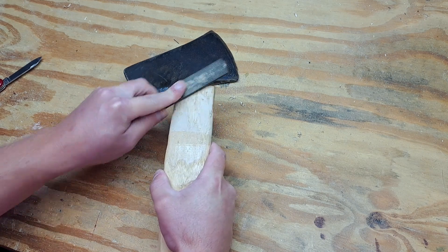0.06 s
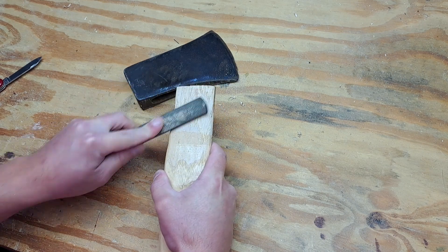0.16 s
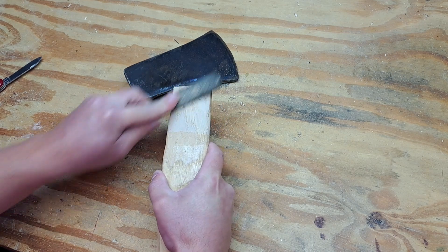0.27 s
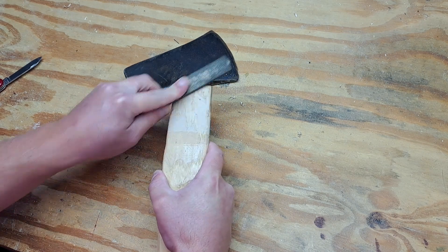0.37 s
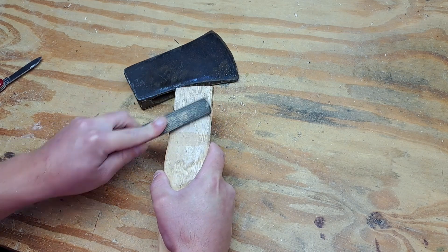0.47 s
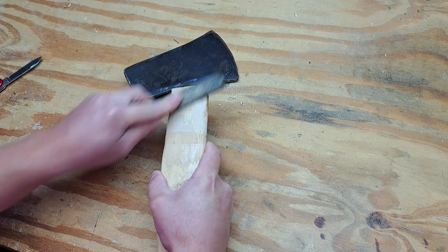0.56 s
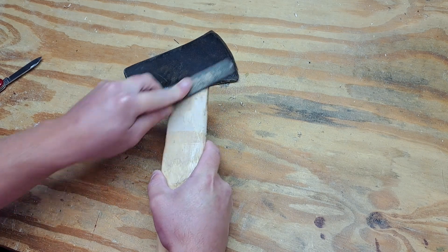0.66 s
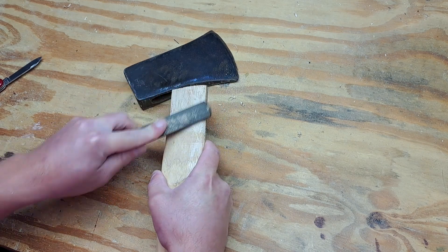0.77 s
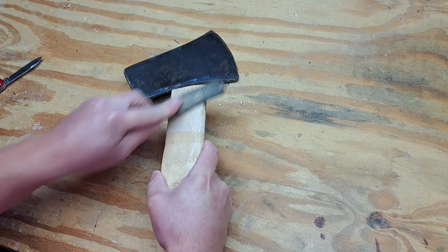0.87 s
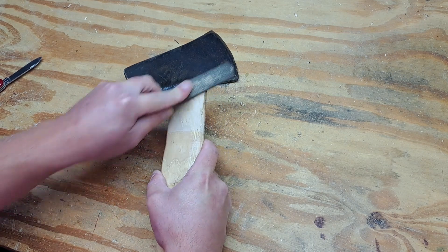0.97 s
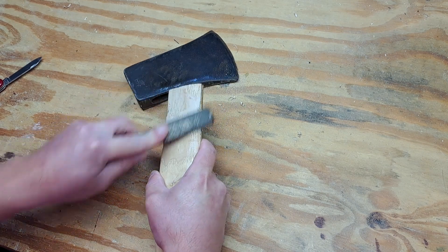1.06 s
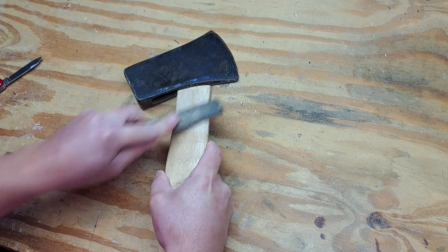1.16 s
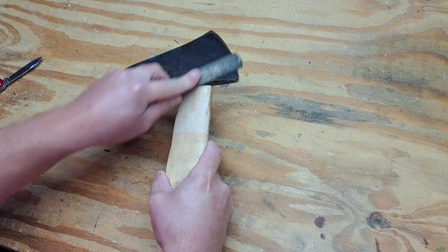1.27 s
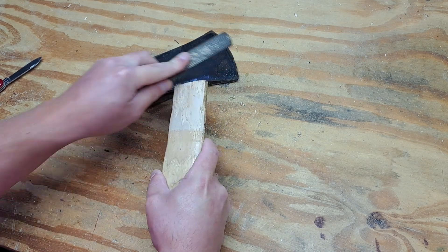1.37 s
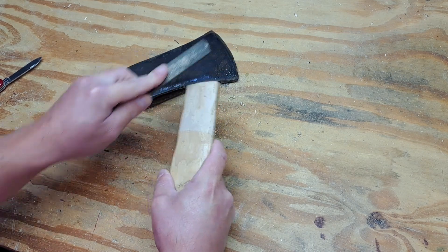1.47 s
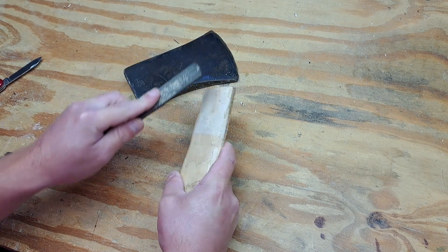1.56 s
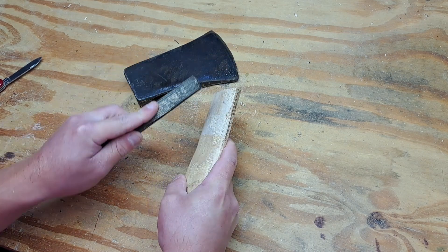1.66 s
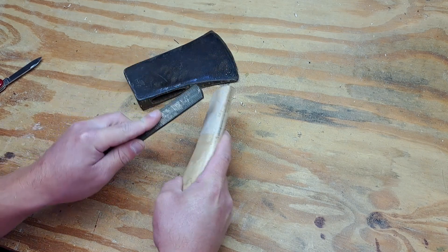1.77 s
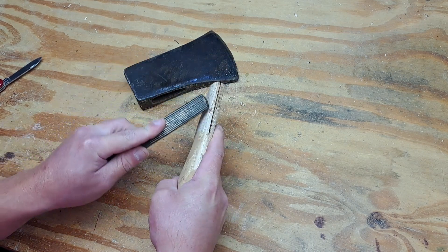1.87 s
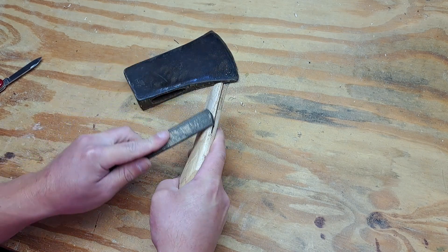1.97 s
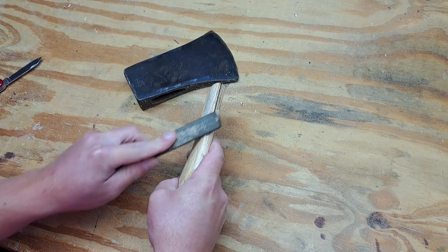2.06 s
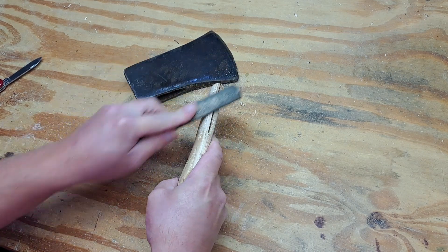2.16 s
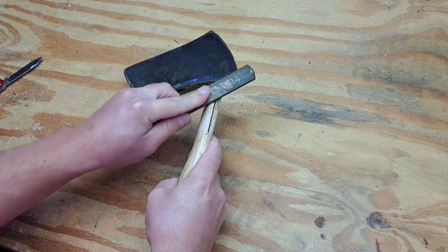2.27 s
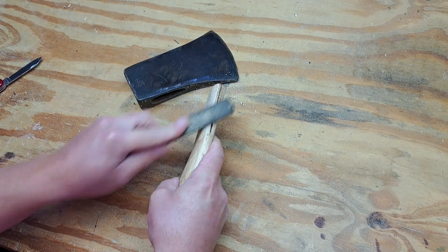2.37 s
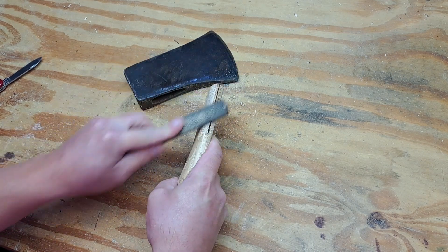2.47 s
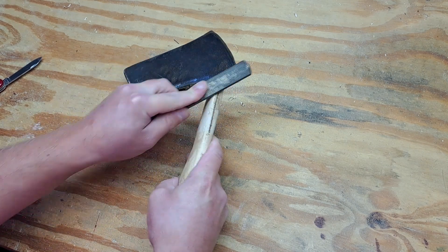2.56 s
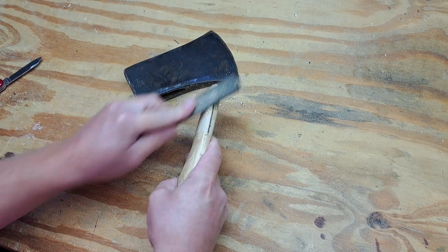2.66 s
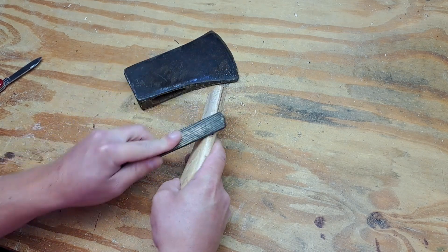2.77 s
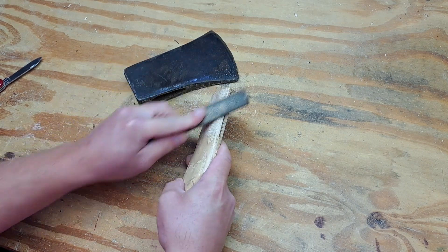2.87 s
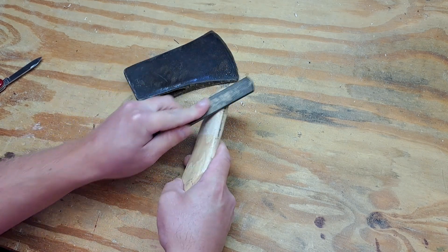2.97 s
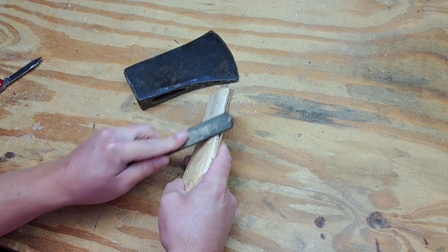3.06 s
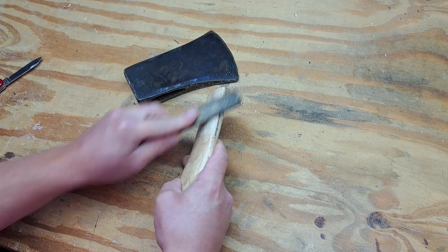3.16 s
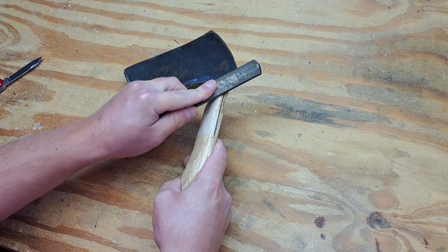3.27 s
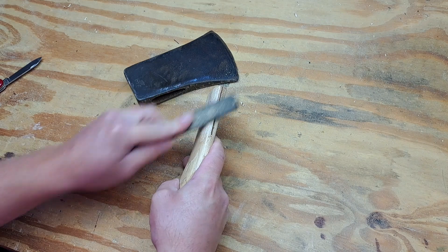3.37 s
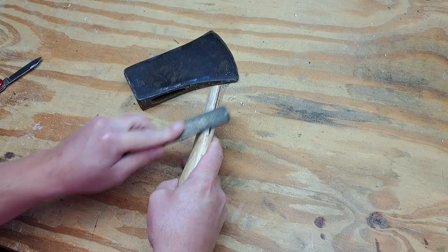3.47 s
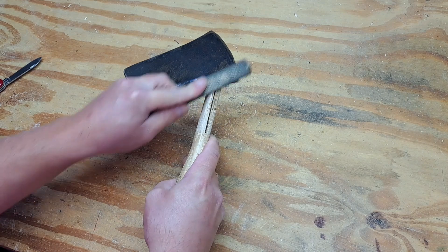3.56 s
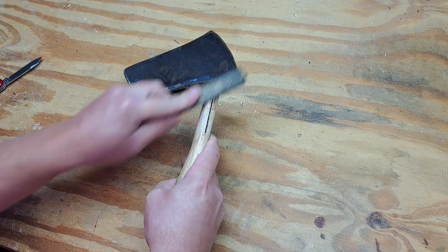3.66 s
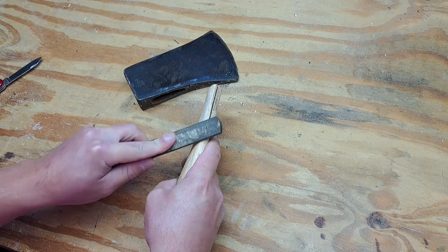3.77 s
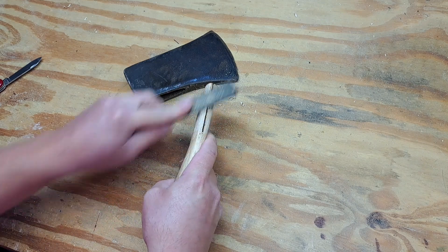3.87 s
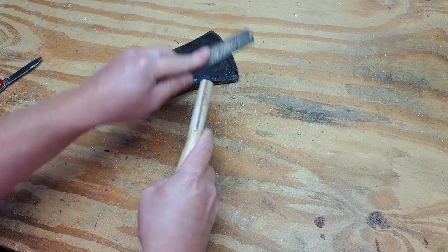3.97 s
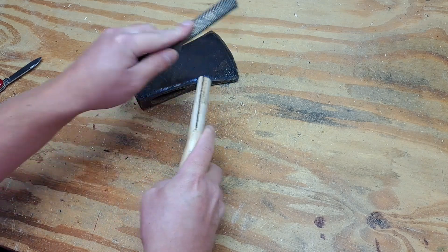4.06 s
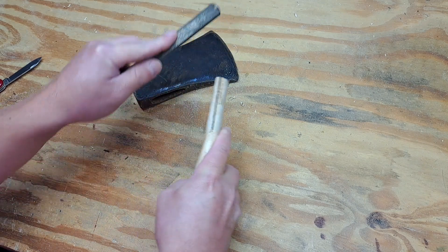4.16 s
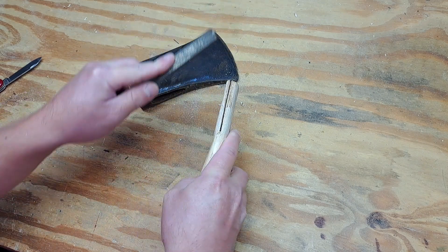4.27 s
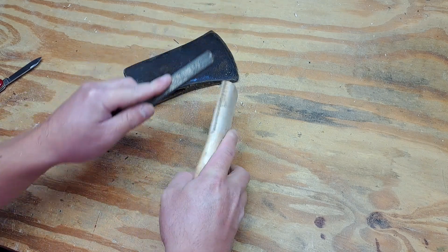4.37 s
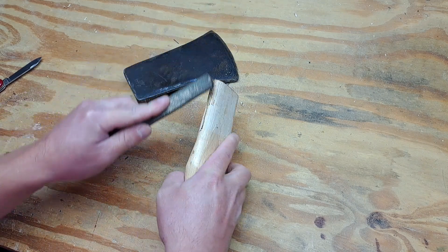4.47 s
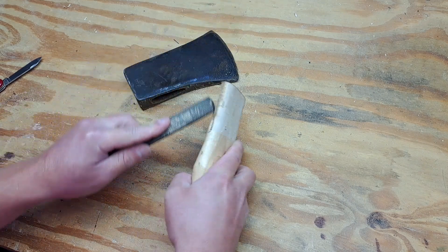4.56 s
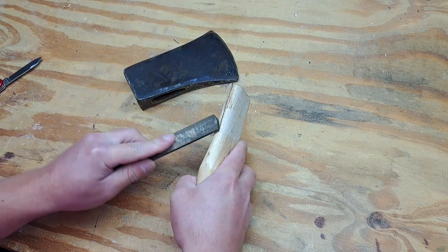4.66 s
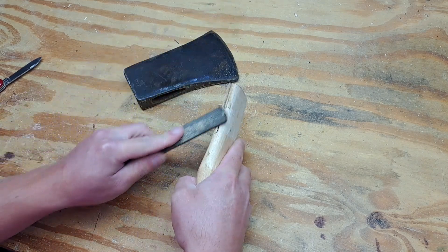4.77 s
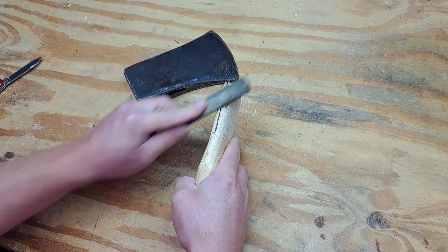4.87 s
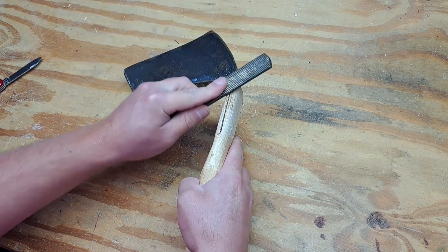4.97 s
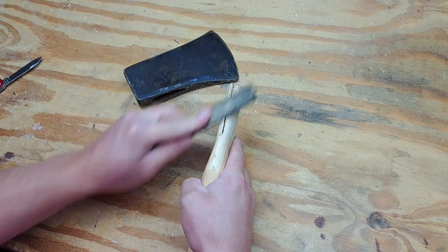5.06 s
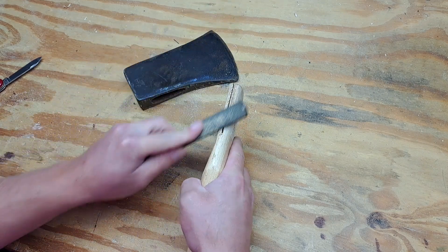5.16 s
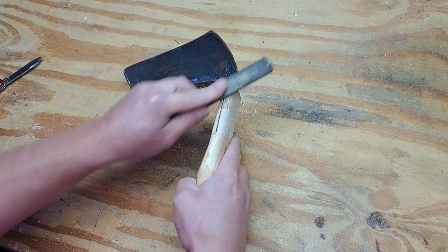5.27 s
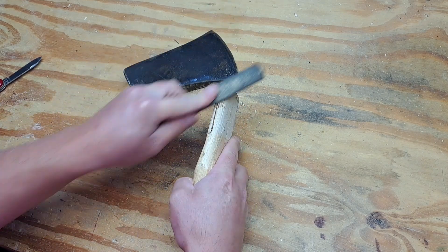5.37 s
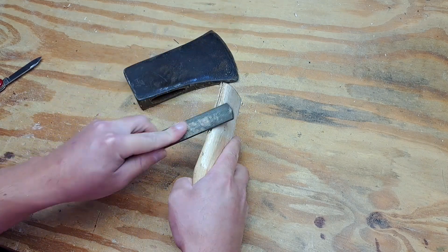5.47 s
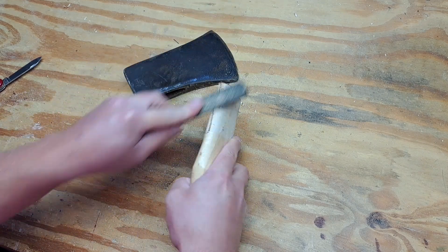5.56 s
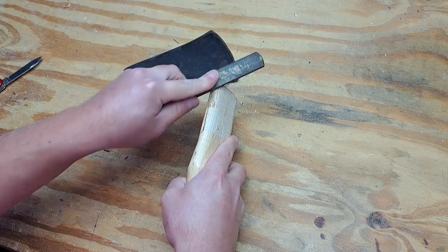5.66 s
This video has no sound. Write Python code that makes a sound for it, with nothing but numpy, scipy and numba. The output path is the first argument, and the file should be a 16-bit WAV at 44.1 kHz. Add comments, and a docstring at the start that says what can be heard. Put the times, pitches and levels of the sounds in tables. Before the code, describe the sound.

A metal rasp scrapes quickly back and forth on a wooden tool handle, gritty and hollow, with two short pauses over a low workshop hum.

```python
"""A rasp is pushed and pulled over a wooden tool handle that rests on a plywood bench: first on its flat face,
then on its edge, then on the bevel between. Random tooth ticks ring modes of bench, handle and steel.
Knocks add single blows; chips and dust add a fine hiss. A left-right microphone pair hears the rasp over
a short, scattered workshop echo. Behind it a fridge-like motor hums in wavering tones, shaped noise makes
the air hiss, and pulsed narrow noise makes a faint cricket."""
import sys
import numpy as np
from scipy import signal
from scipy.fft import rfft, irfft
from scipy.io import wavfile
from scipy.ndimage import uniform_filter1d
from numba import njit

SR = 44100
rng = np.random.default_rng(int(sys.argv[2]) if len(sys.argv) > 2 else 0)


def store_wav(level_fs):
    """Save 16-bit WAV to argv[1]."""
    pcm = np.round(np.clip(np.atleast_2d(level_fs), -1, 1) * 32767)
    wavfile.write(sys.argv[1], SR, pcm.T.astype(np.int16))


N = 252252
T = np.arange(N) / SR

# Motor and mains tones, rms levels: pitch_hz, start_db, end_db, waver_db
HUM = [(59.2, -44, -48, 1.2), (107.7, -56, -45, 1.2), (119.6, -57, -56, 1.2), (215.3, -66, -65, 2),
       (323.0, -69, -71, 2), (527.6, -73, -72, 2), (705.2, -75, -74, 2), (1728, -79, -78, 2)]
# Spectrum of the room air: pitch_hz, relative_level_db (per Hz)
AIR = [(18, -36), (30, -1), (66, -8), (117, -5.5), (168, -22.5), (225, -17), (341, -19.5), (410, -28),
       (532, -23), (1260, -28.5), (1680, -25.5), (2620, -32), (4310, -31), (6000, -37.5), (7400, -51),
       (15500, -51)]
# Tilt of the air noise between the microphones: pitch_hz, left_minus_right_db
AIR_BALANCE = [(60, -1.5), (110, 0), (200, -3), (380, 2.5), (700, -1), (1290, 0), (2380, 0.5), (4400, -0.5),
               (8120, 8), (15000, 11)]
# Cricket chirps: start_s, relative_level_db
CHIRPS = [(1.39, -66), (1.69, -67), (2.0, -63.5), (4.21, -64.5), (4.519, -67)]
# Chips and dust whisper down as the hands shift:
# loudest_s, level_db (before the left-right tilt), rise_s, hold_s, fall_s (rise and fall span 60 dB)
DUST = [(1.33, -63, .05, 0.14, .9), (4.43, -64.5, .12, .04, .3), (4.53, -69, .2, .03, 0.3)]
# The handle bumps the bench or the rasp lands: start_s, relative_push_db, hardness_db (tap against push)
KNOCKS = [(1.034, -23.5, -20), (2.003, -42, -15), (2.554, -23.5, -14), (2.777, -24, -22), (3.092, -27, -21),
          (3.706, -21.5, -17), (4.683, -36.5, -9.5), (5.069, -22.5, -18), (5.105, -19.5, -16),
          (5.394, -29.5, -9), (5.616, -20.5, -22)]
# Rasp strokes: full_speed_s, rise_s, hold_s, fall_s, swell_db (over the hold),
# then drive levels steel_db, bench_db, low_wood_db, high_wood_db
STROKES = [(-0.025, 0.092, 0.052, 0.054, -3.5, -28, -35, -26.5, -24.5),
           (0.158, 0.064, 0.015, 0.063, 3, -31.5, -38, -28.5, -27.5),
           (0.29, 0.051, 0.011, 0.072, 3, -27.0, -33.5, -28.0, -24),
           (0.461, 0.06, 0.012, 0.059, 0.5, -31.0, -37, -31.5, -25.5),
           (0.583, 0.062, 0.052, 0.038, 5, -35, -39, -30.5, -27.5),
           (0.731, 0.077, 0.049, 0.057, 5.5, -37, -32.5, -34, -30),
           (0.873, 0.058, 0.067, 0.044, 12, -35.5, -40.5, -33, -29.5),
           (1.053, 0.073, 0.047, 0.074, -1, -38.5, -31.5, -32, -32),
           (1.209, 0.057, 0.068, 0.077, 7, -35.5, -32.5, -30.5, -30.5),
           (1.373, 0.051, 0.025, 0.074, -7, -59, -52.5, -48, -50),
           (2.013, 0.017, 0.14, 0.062, 15, -60, -45, -46, -48),
           (2.161, 0.053, 0.056, 0.1, -3, -31.5, -32.0, -34, -34.5),
           (2.394, 0.071, 0.02, 0.066, 1.5, -39.5, -31, -29.5, -36.0),
           (2.516, 0.036, 0.029, 0.096, 1, -30.5, -30.5, -30, -31.5),
           (2.733, 0.11, 0.03, 0.051, -1.5, -39.5, -30.0, -34, -38),
           (2.862, 0.047, 0.029, 0.096, 3, -29, -28.5, -31.5, -32.5),
           (3.051, 0.051, 0.038, 0.063, 10, -41, -32.5, -35, -39),
           (3.17, 0.029, 0.069, 0.08, 6, -32, -32.5, -34.5, -32.5),
           (3.383, 0.079, 0.042, 0.051, 6.5, -39.5, -27, -31.5, -36),
           (3.547, 0.073, 0.019, 0.082, -0.5, -31, -32.0, -28.5, -31),
           (3.707, 0.057, 0.058, 0.072, 1, -41.5, -31, -33, -38.5),
           (3.9, 0.082, 0.029, 0.066, 0, -32, -31.5, -31.0, -30.5),
           (4.012, 0.059, 0.025, 0.14, -5, -60, -60, -55.5, -53.5),
           (4.69, 0.012, 0.042, 0.11, -3.0, -72, -41.5, -54.5, -62),
           (4.847, 0.078, 0.082, 0.087, 1.5, -35.0, -28, -33, -35),
           (5.078, 0.052, 0.041, 0.082, 2.5, -42.5, -26.5, -27.0, -38),
           (5.239, 0.06, 0.054, 0.064, -1.5, -32.5, -30, -31, -34.5),
           (5.414, 0.054, 0.065, 0.044, -2, -39, -32, -29.5, -37.0),
           (5.62, 0.095, 0.024, 0.063, 2.5, -32.5, -30, -23.5, -32.5)]
# When the rasp moves on to the next spot: start_s
TURNS_S = [.55, 1.9, 4.35, 5.02]
# The teeth bite in suddenly: start_s, jump_db (as much lower just before; negative reverses it)
BITES = [(0.274, 3.5), (0.72, 9), (1.024, 0), (1.19, 5.5), (2.004, -2), (2.835, 2), (2.852, 2.5),
         (3.376, -3.5), (3.512, -3), (3.703, 3.5), (3.848, 3), (4.686, 11.5), (5.082, 2), (5.398, -1)]
# Brief surges: the teeth dig in and brighten, or the handle shudders on the bench:
# centre_s, half_length_s, steel_extra_db, bench_extra_db, wood_extra_db
SURGES = [(0.028, 0.017, 0, 0.5, 0), (0.198, 0.015, -1.5, 4, 3.5), (0.639, 0.012, 6.5, 3, -0.5),
          (0.949, 0.012, 4.5, 5, 0.5), (1.046, 0.013, 0, 3, 1), (1.292, 0.017, 5, 3, 1.5),
          (2.19, .015, 1, 4.5, 2), (2.452, 0.022, -3, 6.5, 1.5), (2.57, 0.018, 2, 2.5, 0),
          (2.783, 0.014, -3, 6.5, 0), (2.92, .015, 0, 2.5, -0.5), (3.133, 0.018, -5, 6, 1),
          (3.253, .015, 3.5, 0.5, -0.5), (3.453, .012, 1, 0, 3.5), (3.564, .015, 2, 4, 0),
          (3.788, 0.016, -0.5, 2.5, 1), (3.92, 0.016, 3, -2, -1), (4.929, .015, -0.5, -4, 4.5),
          (5.098, 0.013, -1.5, -2, 2), (5.148, 0.014, 0.5, 5.5, 0.5), (5.312, 0.013, 1, 1, 2),
          (5.498, .02, 0, 5.5, 0.5), (5.635, 0.015, 0.5, 2, 2.5)]
# The next three each list steel, bench, low wood, high wood.
# Loss once the rise or fall time is spent: loss_db
STOPPED_DB = [24.2, 12, 19.4, 21.3]
# How much of a stroke's swell reaches each body: share (0 to 1)
SWELL_SHARE = [0.66, 0.49, 0.62, 0.52]
# How late each body follows the stroke: delay_s
LATE_S = [0.0021, 0.0062, 0.001, 0.00033]
# Modes of the plywood bench: pitch_hz, width_hz (nominal), then relative levels face_near_tip_db,
# face_lower_down_db, edge_db, bevel_top_db, bevel_foot_db, then left_minus_right_db, left_lead_rad
BENCH = [(54, 26, -49, -46, -41.5, -48, -47, -0.5, 0.052), (86, 44, -46, -39.5, -39.5, -41.5, -36.5, 0, 0),
         (146, 52, -47, -41, -39, -39, -38, -1, -0.057),
         (189, 28.4, -53, -44.5, -37, -45, -35.5, -4.5, 0.12),
         (214.8, 28, -46.5, -41.5, -36, -31.5, -32, 0.5, -0.0056),
         (241.5, 44, -51.5, -48.5, -39, -38.5, -37.5, -3.5, 0.23),
         (294.7, 57, -45, -46, -41, -53, -37, 0.5, 0.054),
         (353, 49, -43.5, -47, -51, -52, -41, -2.5, -0.18)]
# Modes of the wooden handle: columns as for the bench [Hz, Hz, five dB, dB, rad]
HANDLE = [(425.7, 49.6, -36.5, -37, -39, -35.5, -35, -3, 0.48),
          (476, 23.4, -45, -37.5, -43, -45, -37.5, -1.5, -0.8),
          (518, 41, -43.5, -55, -46.5, -46, -49, 6.5, 1.6), (617, 115, -44, -45, -44, -44, -41.5, -7.5, 1),
          (736.5, 49, -45.5, -44, -39.5, -38, -37, 0.5, 0.66),
          (777, 41, -50.5, -46.5, -48.5, -45, -45, 0, 0.3), (863, 98, -56, -51, -47, -44.5, -44.5, -2, 1),
          (1028, 49, -51, -44, -43.5, -51, -47, 6, 0.76), (1117, 75, -42, -36, -47, -53.5, -49.5, -6.5, 0),
          (1228.4, 45, -36.5, -39.5, -52, -48, -44.5, 2.5, 0.93),
          (1327, 59, -45.5, -40.5, -43.5, -45.5, -39, -5, 1.57),
          (1520, 240, -39, -44.5, -48, -40.5, -47.5, 3, 1.18),
          (1682, 100, -44, -53.5, -53.5, -40, -49, -4, 2.5),
          (1839.6, 44, -39.5, -44.5, -44, -49, -54, -1.5, 1.56),
          (1945, 74, -38.5, -50, -50.5, -47, -49, 2.5, 2.16),
          (2096, 130, -42.5, -46.5, -50.5, -54, -50.5, -1, 0.7),
          (2336, 98, -41.5, -44, -46.5, -53, -50, 2, 1.5),
          (2500, 170, -55, -53.5, -48.5, -52.5, -58, 4.5, 2.07),
          (2790, 320, -44, -47.5, -51, -50, -50.5, -5.5, 2.03),
          (3152, 180, -39.5, -46, -55, -53, -52, 5, 1.1)]
# Modes of the steel rasp: columns as for the bench [Hz, Hz, five dB, dB, rad]
STEEL = [(3510, 420, -40, -49.5, -48, -51, -51.5, 0, 1.97),
         (3850, 160, -43, -41, -43.5, -42.5, -43.5, -1, 3),
         (4290, 310, -45.5, -47.5, -45.5, -47, -48, 2, -1.5),
         (4720, 120, -41.5, -47.5, -48, -49, -47, -6, -2),
         (5010, 170, -42.5, -48, -47, -48, -49, -0.5, -1.5),
         (5350, 310, -36, -61, -57.5, -55, -46, -4.5, -2.5),
         (5550, 190, -48, -43.5, -44.5, -40.5, -43.5, -3.5, -3.5),
         (5890, 195, -46.5, -42, -44.5, -43.5, -49.5, 10, 2),
         (6240, 260, -49.5, -45, -42, -45.5, -46, -3, 2), (7070, 540, -47.5, -51, -50.5, -50, -53.5, 3, -2),
         (8250, 4100, -48, -52.5, -53.5, -54, -57, 8, -0.5),
         (9470, 1550, -55.5, -59, -50, -51, -55.5, 9, 3.5), (10300, 1700, -57, -76, -68, -61, -56.5, 0, -1),
         (12160, 1300, -53, -55, -51, -50.5, -54, 11, 0.5),
         (14460, 1900, -49, -50, -46.5, -47, -48.5, 3, -3)]

AIR_DB = -49.5  # rms
ROOM_T60_S, ROOM_DB = 0.14, -17.5  # decay and level of the duller echo, against the direct sound
TICKS_PER_S, TICK_SPREAD_DB, CHATTER_DB = 5000, 2, 1
SPLIT_HZ = 900  # handle modes below are low wood, the rest high wood
EASING = 1.4  # how round the start and end of a stroke are
TOP_HZ = 15780  # top of the recorder's range


def undb(db):
    """Decibels to gain."""
    return 10 ** (np.asarray(db) / 20)


def unit(x):
    """Scaled to rms 1."""
    return x / np.sqrt(np.mean(x ** 2))


def band(x, lo_hz, hi_hz):
    """Gentle band-pass."""
    edges = [lo_hz, min(hi_hz, .45 * SR)]
    return signal.sosfilt(signal.butter(2, edges, "bandpass", fs=SR, output="sos"), x)


def walk(rate):
    """Random levels held 1 / rate s and slewed twice; spread 1."""
    k = int(SR / rate)
    steps = np.repeat(rng.standard_normal(N // k + 1), k)
    return unit(uniform_filter1d(uniform_filter1d(steps, k), k)[:N])


def on_log(table, hz):
    """A (pitch_hz, value) table read on a log-frequency axis."""
    f, v = np.transpose(table)
    return np.interp(np.log(np.maximum(hz, 1)), np.log(f), v)


def air():
    """Steady room noise: bass shared by both microphones, treble unrelated."""
    hz = np.fft.rfftfreq(N, 1 / SR)
    mid, side = rfft(rng.standard_normal((2, N))) * undb(on_log(AIR, hz))
    alike = 1 / (1 + (hz / 350) ** 2)
    pan = undb(on_log(AIR_BALANCE, hz) / 2)
    shared, opposed = np.sqrt(1 + alike) * mid, np.sqrt(1 - alike) * side
    pair = np.array([(shared + opposed) * pan, (shared - opposed) / pan])
    return unit(irfft(pair, N)) * undb(AIR_DB + 0.6 * walk(3.84))


def hum():
    """Motor and mains tones that waver a little, nearly the same left and right."""
    tones = np.zeros(N)
    for hz, start_db, end_db, waver_db in HUM:
        level_db = start_db + (end_db - start_db) * T / T[-1] + waver_db * walk(5.9)
        tones += undb(level_db) * np.sin(2 * np.pi * (hz * T + rng.random()))
    return np.sqrt(2) * tones * undb([[-.6], [.6]])


def cricket(hz=4290, pulse_hz=45, length_s=0.055):
    """Short throbbing chirps of a wing resonance, made of narrow noise."""
    gate = np.zeros(N)
    for s, db in CHIRPS:
        sounding = (T > s) & (T < s + length_s)
        gate += undb(db) * sounding * np.sin(np.pi * pulse_hz * (T - s)) ** 2
    tone = unit(band(rng.standard_normal((2, N)), hz - 70, hz + 70))
    return band(2.8 * gate * tone, hz - 200, hz + 200)


def dust():
    """Chips and dust: a fine, high hiss, stronger at the left microphone."""
    gain = 0
    for s, db, rise, hold, fall in DUST:
        slack = np.maximum(np.maximum((s - T) / rise, (T - s - hold) / fall), 0)
        gain = gain + undb(db - 60 * slack)
    hiss = band(band(rng.standard_normal((2, N)), 8500, 20000), 8500, 20000)
    return gain * unit(hiss) * undb([[5], [-2]])


def room(x):
    """Decaying scatter off walls and shelves, duller as it fades, different at each microphone."""
    t = T[:SR // 2]
    tail = rng.standard_normal((2, len(t))) * (t > .006)  # the first echo comes after 6 ms
    dull = band(tail, 66, 2320) * undb(-60 * t / ROOM_T60_S)
    bright = band(tail, 2950, 20000) * undb(-60 * t / (0.85 * ROOM_T60_S))
    dull_size = np.sqrt((dull ** 2).sum(axis=1).mean())
    echo = (dull + bright) / dull_size * undb(ROOM_DB)
    return signal.fftconvolve(x, echo, axes=1)[:, :N]


def ticks():
    """Teeth catching fibres at random moments, a few much harder than the rest."""
    strength, chance = rng.random((2, N))
    hardness = undb(-TICK_SPREAD_DB * np.log(strength + 1e-9))
    return unit(hardness * (chance < TICKS_PER_S / SR))


def blows(soft_s):
    """A soft push for the bench and a sharp tap for the handle at every knock."""
    low, high = np.zeros(N), np.zeros(N)
    for s, db, hard_db in KNOCKS:
        low[int(s * SR)] = undb(db)
        high[int(s * SR)] = undb(db + hard_db)
    return np.convolve(low, np.hanning(int(soft_s * SR)))[:N], high


def effort():
    """Drive of each body in dB: every stroke speeds up, holds while it swells or fades, and slows down."""
    depth_db, share, late = (np.array(v)[:, None] for v in (STOPPED_DB, SWELL_SHARE, LATE_S))
    coarse = T[::64]
    t = coarse - late
    power = 1e-18
    for s, rise, hold, fall, swell_db, *peak_db in STROKES:
        slack = np.maximum(np.maximum((s - t) / rise, (t - s - hold) / fall), 0)
        lean = np.clip((t - s) / hold, 0, 1) - .5
        level_db = np.array(peak_db)[:, None] + share * swell_db * lean - depth_db * slack ** EASING
        power = power + undb(level_db) ** 2
    surge_db = 0
    for s, half, steel, bench, wood in SURGES:
        extra_db = np.array([steel, bench, wood, wood])[:, None]
        surge_db = surge_db + extra_db * np.exp(-((coarse - s) / half) ** 2)
    return [np.interp(T, coarse, db) for db in 10 * np.log10(power) + surge_db]


@njit
def resonate(x, pole):
    """Two equal complex poles in a row, free to move every sample; the valleys between modes stay dark."""
    y = np.empty(x.shape, np.complex128)
    for c in range(x.shape[0]):
        a = b = 0j
        for i in range(x.shape[1]):
            a = a * pole[i] + x[c, i] + 1e-18
            b = b * pole[i] + a
            y[c, i] = b
    return y


def ring(modes, push, blow, spot, lo_hz, hi_hz, wander_db=2.5, bend=0.0095, alike_hz=2500, least=.4):
    """Ticks and blows ring a body's modes, shares set by spot; the right microphone hears part its own way."""
    modes = np.array(modes, float)
    power = 10 ** (modes[:, 2:-2] / 10)
    share = np.sqrt(2 * power / power.sum(axis=0))  # the same total power at every spot
    out = np.zeros((2, N))
    for k, (hz, width, pan_db, lead) in enumerate(modes[:, [0, 1, -2, -1]]):
        r = np.exp(-np.pi * width * np.sqrt(2) / SR)
        # the changing pressure of hand and rasp bends the pitch a little
        pole = r * np.exp(2j * np.pi * hz * (1 + bend * walk(11)) / SR)
        # every tooth lands on another fibre and kicks the mode one way or the other
        kicks = push * (2. * rng.integers(0, 2, (2, N)) - 1) + blow
        level = np.sqrt((1 - r * r) ** 3 / (1 + r * r))  # evens out narrow and wide modes
        both, alone = resonate(kicks, pole) * level
        alike = np.clip(1 / np.hypot(1, hz / alike_hz), min(least, 1), 1)
        right = alike * both + np.sqrt(1 - alike ** 2) * alone
        # the contact point travels, so each mode comes and goes
        gain = share[k, spot] * undb(wander_db * walk(14))
        out[0] += gain * undb(pan_db / 2) * (both * np.exp(.5j * lead)).imag
        out[1] += gain * undb(-pan_db / 2) * (right * np.exp(-.5j * lead)).imag
    return band(out, lo_hz, hi_hz)


def rasp():
    """The same ticks drive every body; the light steel follows their chatter most, the heavy bench least."""
    steel_db, bench_db, low_db, high_db = effort()
    spot = np.searchsorted(TURNS_S, T)
    chatter_db = CHATTER_DB * walk(60) + 1.0 * walk(220)
    # the teeth stick for a moment, then tear loose
    bite_db = sum(db * np.sign(T - s) * np.exp(-np.abs(T - s) / 0.0072) for s, db in BITES)
    push = ticks() * undb(bite_db)
    thud, tap = blows(0.0018)
    low_modes = [m for m in HANDLE if m[0] < SPLIT_HZ]
    high_modes = [m for m in HANDLE if m[0] >= SPLIT_HZ]

    bench_push = push * undb(bench_db + 0.23 * chatter_db)
    low_push = push * undb(low_db + 0.23 * chatter_db)
    high_push = push * undb(high_db + 0.35 * chatter_db)
    steel_push = push * undb(steel_db + chatter_db)

    bench = ring(BENCH, bench_push, undb(-1.5) * thud, spot, 44, 585,
                 wander_db=1.23, bend=0.015, alike_hz=5000)
    low_wood = ring(low_modes, low_push, undb(30.5) * tap, spot, 315, 1700,
                    wander_db=1.5, bend=0.0096, alike_hz=830)
    high_wood = ring(high_modes, high_push, undb(17.5) * tap, spot, 1020, 5500)
    steel = ring(STEEL, steel_push, 0, spot, 2900, 20000, alike_hz=6000)
    return bench + low_wood + high_wood + steel


def scene():
    """Rasp in its room, over the workshop's own sounds."""
    background = air() + hum() + cricket()
    tool = rasp()
    return background + dust() + room(tool) + tool


def record(dry):
    """The microphones lose the deepest bass and the recorder cuts the top."""
    dry = signal.sosfilt(signal.butter(4, 44, "highpass", fs=SR, output="sos"), dry)
    return signal.sosfilt(signal.ellip(14, .2, 70, TOP_HZ, fs=SR, output="sos"), dry)


dry = scene()
out = record(dry)
store_wav(out)
```